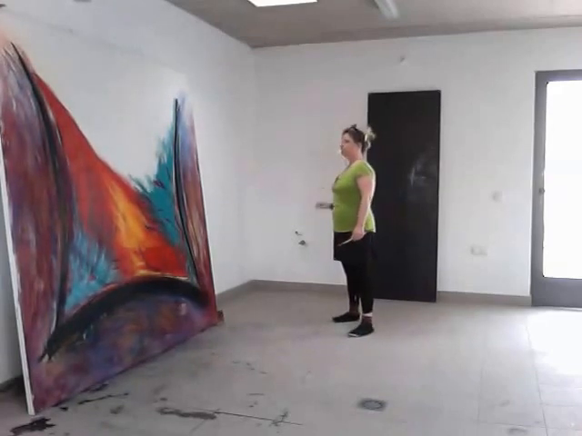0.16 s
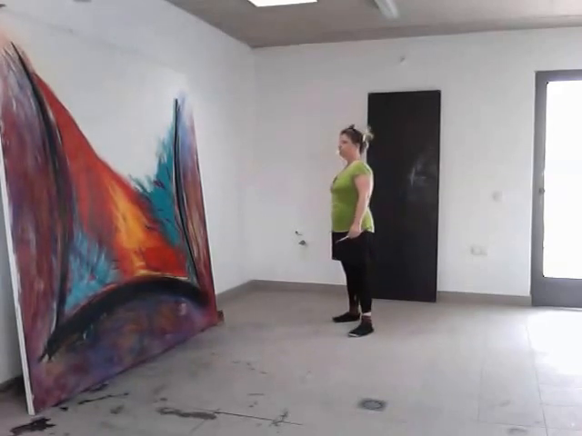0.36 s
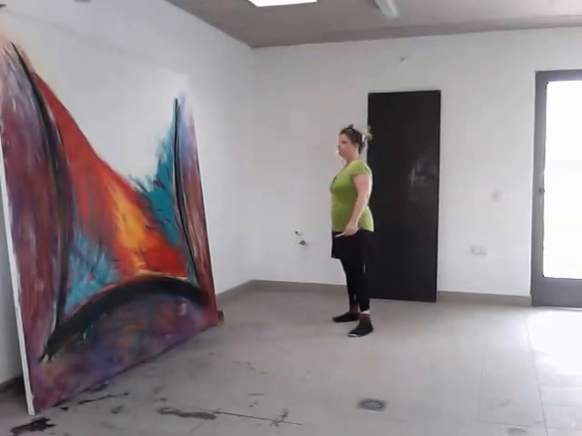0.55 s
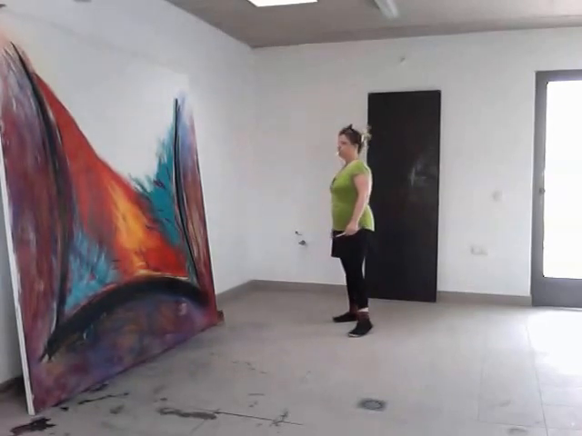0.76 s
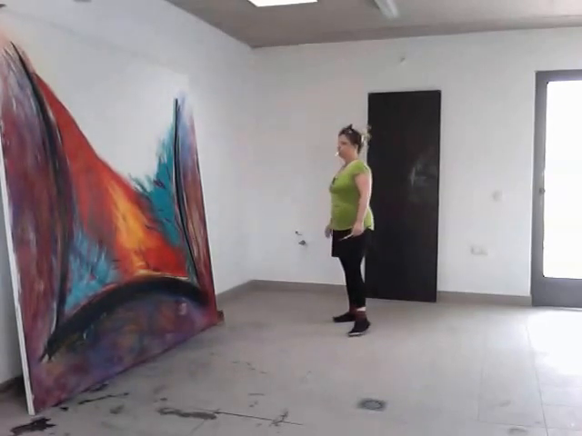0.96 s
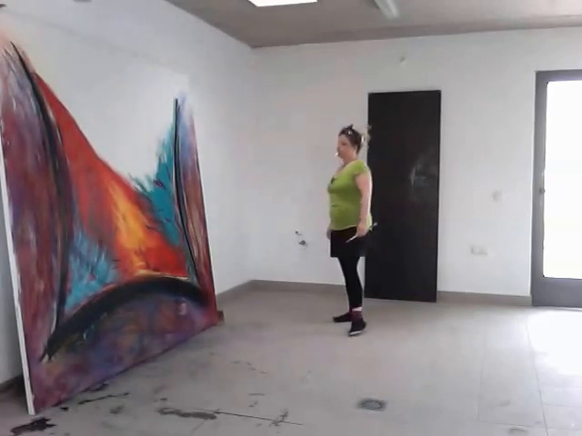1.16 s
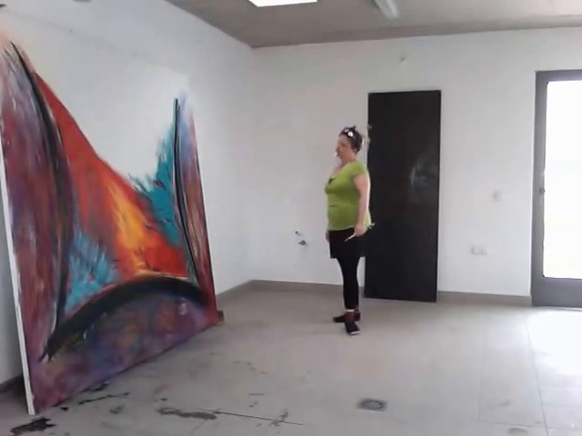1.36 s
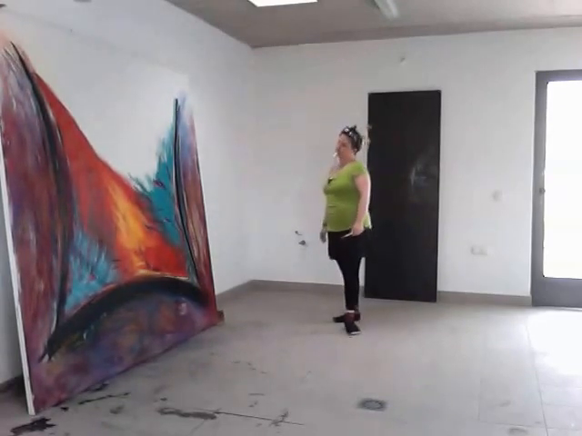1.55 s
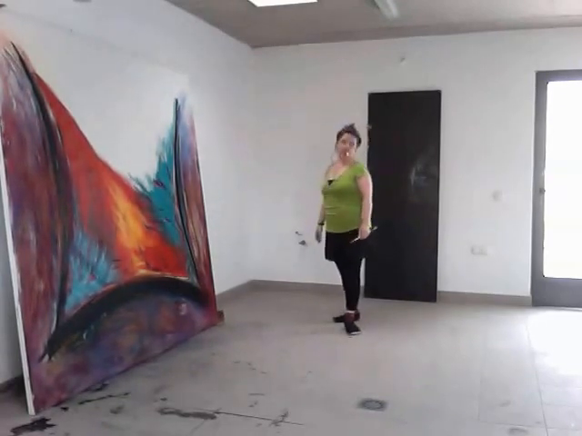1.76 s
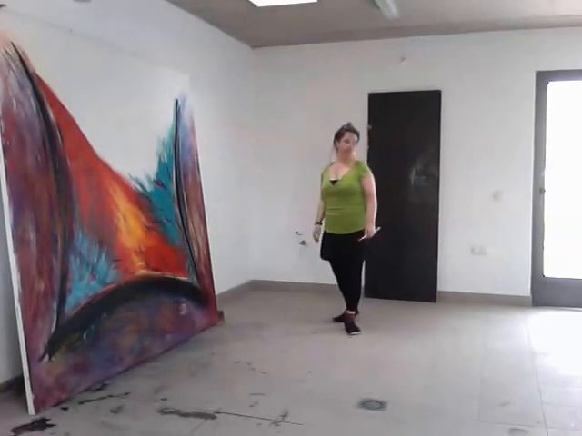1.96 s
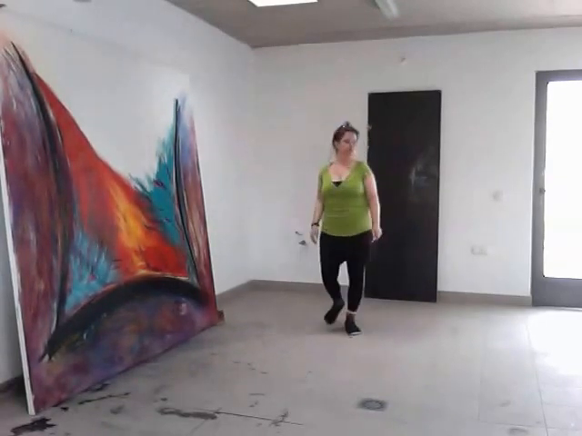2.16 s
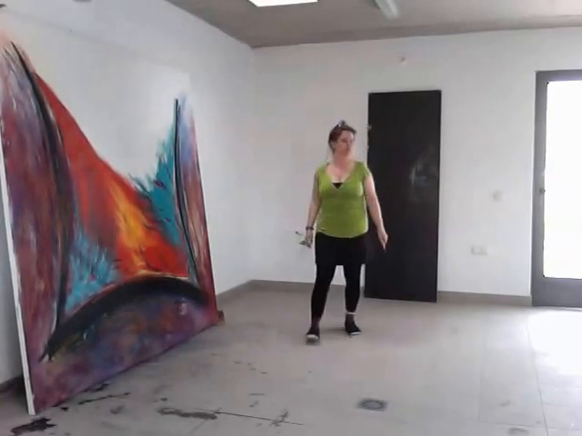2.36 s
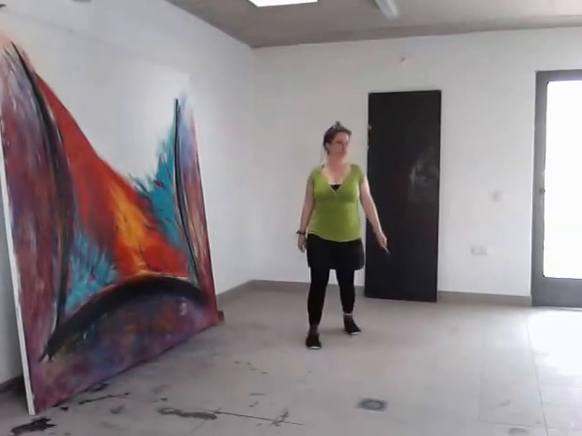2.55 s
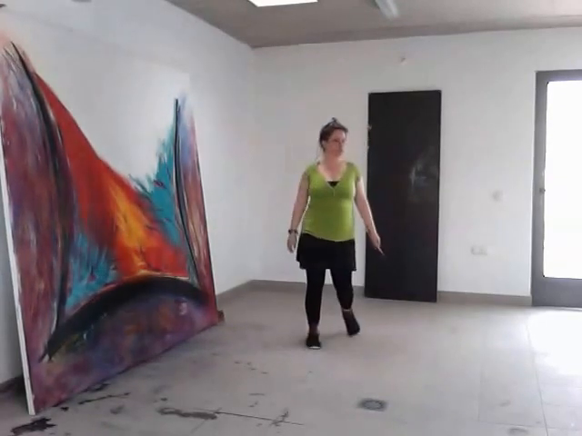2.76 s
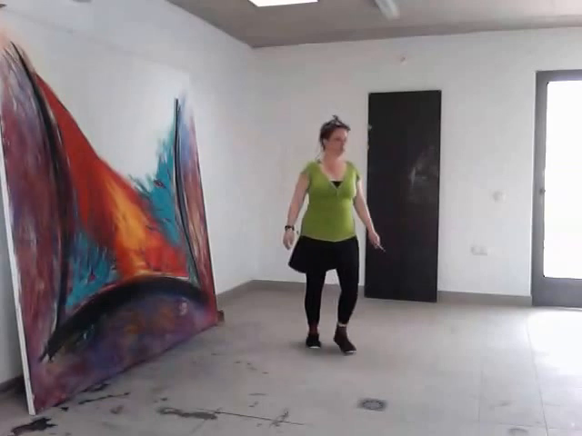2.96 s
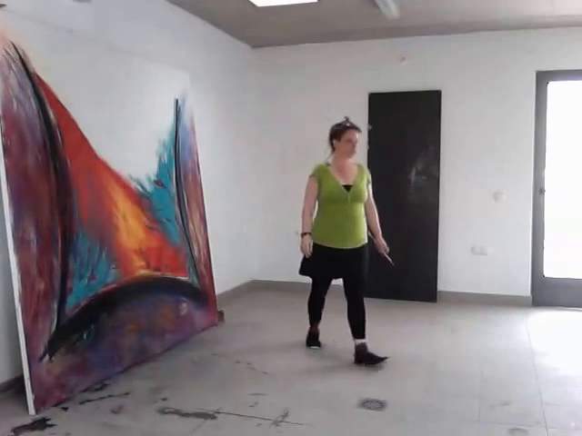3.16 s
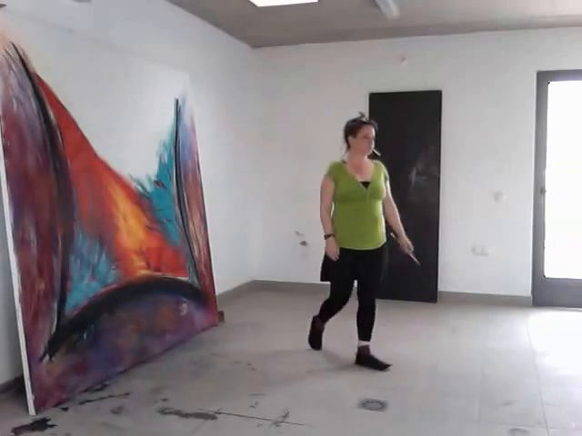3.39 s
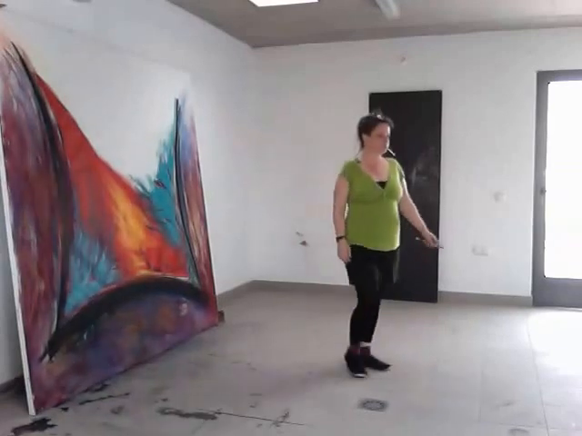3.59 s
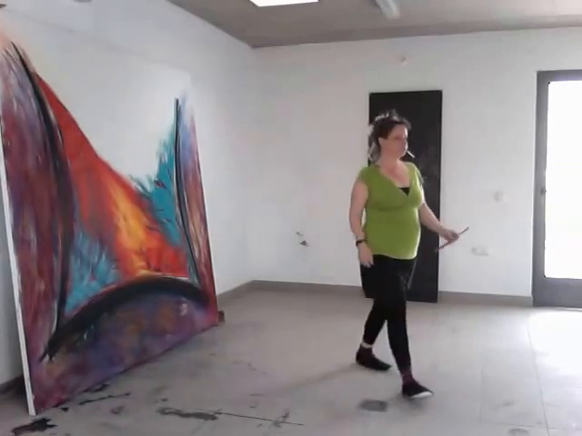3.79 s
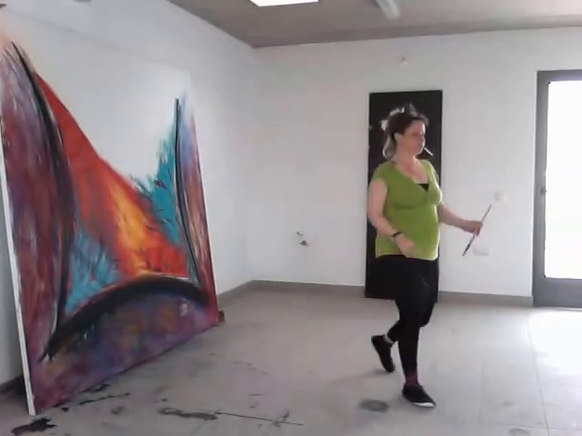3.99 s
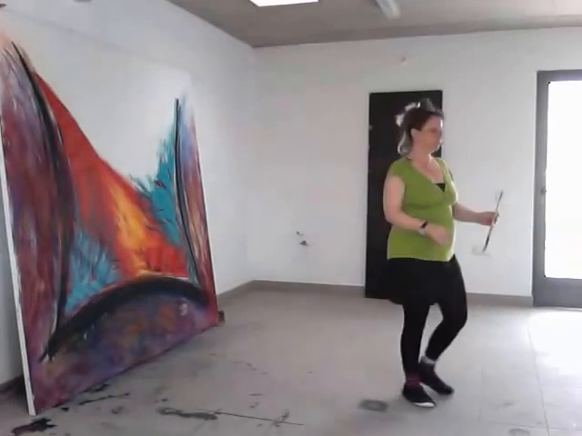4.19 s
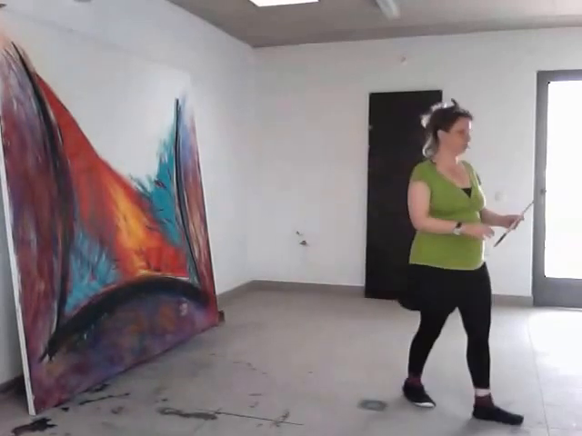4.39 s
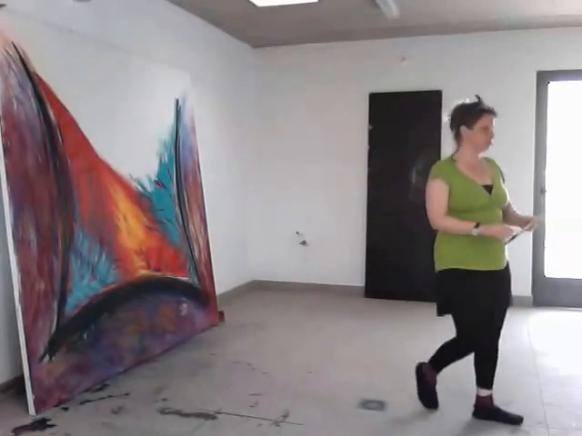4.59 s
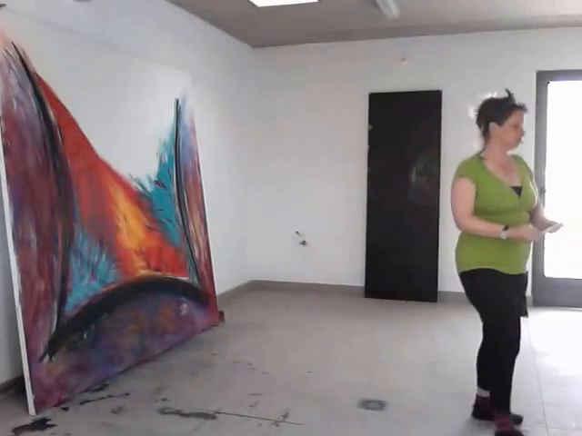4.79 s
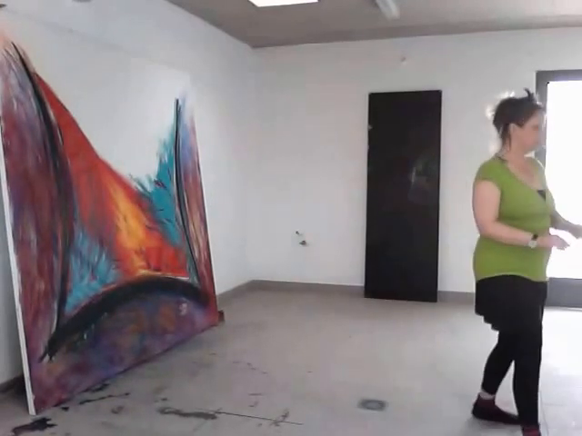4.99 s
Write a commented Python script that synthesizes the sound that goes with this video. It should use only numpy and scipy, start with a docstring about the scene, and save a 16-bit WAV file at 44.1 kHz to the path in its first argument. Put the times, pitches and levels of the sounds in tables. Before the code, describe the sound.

Soft shoes turn and then scuff across a tiled floor in a bare, echoing room, over a faint hiss and rumble.

```python
"""A bare, tiled room: someone in soft shoes turns on the spot, then walks across the floor.
One sole slides round, then five steps scuff. The sound is stick-slip friction: dense grit catches and
slips under the rubber, while light contacts of heel and toe excite resonances of the shoe.
Hard walls return early reflections and a long reverberation, over a low rumble and a faint hiss."""
import sys
import numpy as np
from scipy import signal
from scipy.fft import rfft, irfft, next_fast_len
from scipy.io import wavfile
from scipy.ndimage import uniform_filter1d

SR = 44100
rng = np.random.default_rng(int(sys.argv[2]) if len(sys.argv) > 2 else 0)


def log_audio(samples):
    """Write samples as a 16-bit WAV file to the path given in sys.argv[1]."""
    # one column per channel
    frames = np.atleast_2d(samples).T
    # limit to full scale, then quantise
    limited = np.clip(frames, -1, 1)
    pcm = np.round(limited * 32767).astype(np.int16)
    wavfile.write(sys.argv[1], SR, pcm)


N = 221955
TIME = np.arange(N) / SR
SIZE = next_fast_len(N, real=True)
FREQ = np.maximum(np.arange(SIZE // 2 + 1) * SR / SIZE, 1)
TOP_HZ = 15650


# Steps: (time [s], mid-band peak level [dB], swell [dB], time to peak [s], fade [dB/s], length [s],
#         rasp gain [dB], time to lie flat [s], treble gain [dB], heel level [dB], heel resonance [Hz])
STEPS = [(2.431, -28.5, 6.5, 0.055, 88.5, 0.23, -14.5, 0.019, -6.5, -46, 3020),
         (3.051, -32, 2.5, 0.05, 77, 0.16, -16.5, 0.01, -6.5, -31.5, 2780),
         (3.705, -32, 10, 0.0067, 63, 0.19, -18.5, 0.042, -6.5, -33, 2820),
         (4.297, -29, 2.5, 0.082, 66, 0.2, -12.5, 0.0021, -8.5, -31, 5550),
         (4.862, -30.5, 8.5, 0.037, 57, 0.14, -22, 0.034, -5.5, -32, 4160)]
# Resonance of the sole in each step: (frequency [Hz], bandwidth [Hz], boost [dB], low cutoff [Hz])
SOLE_RESONANCES = [(3670, 500, 2.5, 1470), (3080, 3000, 5.5, 1300), (4640, 800, 1.5, 1770),
                   (3950, 420, 2.5, 1250), (5010, 1200, 2, 1600)]
# Friction spectrum of a scuff: (frequency [Hz], relative level [dB])
SCUFF_SPECTRUM = [(530, -51), (900, -64), (1050, -28), (1330, -23.5), (1880, -14.5), (2070, -10.5),
                  (2570, -1.5), (3800, 0.5), (5910, -2), (6980, -5.5), (7960, -6.5), (10600, -17.5),
                  (11900, -24), (13600, -30.5), (15500, -42)]

def scuffs():
    """Sliding friction: as each skid slows, the sole flattens and rasps lower, and the grit dulls."""
    grit = slips(rate=18000, spread_db=0, judder_db=-2)
    grit = unit(grit + undb(-8.5) * squeaks(rate=820, decay_s=0.0034, spread_db=6))
    spectrum_db = along(SCUFF_SPECTRUM, FREQ) + 15.5 * above(11830, order=16)
    flatten_db_per_s, dull_db_per_s, sizzle_fade_db_per_s = 14, 50.5, 230
    out = 0
    for step, (hz, width_hz, boost_db, cutoff_hz) in zip(STEPS, SOLE_RESONANCES):
        start, peak_db, swell_db, peak_s, fade_db_per_s, length_s, rasp_db, flat_s, grit_db, *_ = step
        age = np.clip(TIME - start, 0, length_s)
        sole_db = boost_db * bell(hz, width_hz) + 10 * np.log10(above(cutoff_hz, order=12))
        held_db = 18 * np.clip(1 - age / flat_s, 0, 1)  # heel first: little rasp until the sole is down
        low_db = rasp_db + flatten_db_per_s * age - held_db
        treble_db = grit_db - dull_db_per_s * age
        sizzle_db = 1 - sizzle_fade_db_per_s * np.maximum(age - 0.135, 0)
        friction = rub(grit, spectrum_db + sole_db, low_db, treble_db, sizzle_db)
        level_db = peak_db + skid(age, swell_db, peak_s, fade_db_per_s)
        out = out + friction * undb(level_db) * contact(start, length_s, bite_s=0.008, lift_s=0.028)
    return out


def heels():
    """Impact excitation: the heel rings the shoe with a brief, dense crack as each skid begins."""
    grit = slips(rate=20000, spread_db=-0.5, judder_db=-1)
    lead_s = 0.0059
    return sum(undb(db) * pulse(start - lead_s, rise_s=0.0078, decay_s=0.01)
               * resonate(grit, hz, width_hz=610, boost_db=18.5) for start, *_, db, hz in STEPS)


SLIDE_START_S = 1.2264
# Friction spectrum of the turning sole: (frequency [Hz], relative level [dB])
SLIDE_SPECTRUM = [(290, -41), (500, -16), (579, -45), (627, -32), (898, -16.5), (1340, -2), (2970, -6.5),
                  (5330, -15), (6960, -25), (8490, -26), (10600, -36), (12000, -53), (15600, -88),
                  (22000, -120)]

def slide():
    """Stick-slip at low speed: the turning sole rubs softer and duller, and the rubber catches more."""
    grit = slips(rate=3200, spread_db=-1, judder_db=2)
    grit = unit(grit + undb(-4) * squeaks(rate=770, decay_s=0.0039, spread_db=2))
    spectrum_db = along(SLIDE_SPECTRUM, FREQ) + 3 * bell(2300, 400) - 5 * bell(730, 300)
    spectrum_db -= 6 * above(15000, order=16)
    length_s = 0.25
    age = np.clip(TIME - SLIDE_START_S, 0, length_s)
    low_db = -1.5 + skid(age, swell_db=18, peak_s=0.12, fade_db_per_s=9)
    level_db = -44 + skid(age, swell_db=21, peak_s=0.069, fade_db_per_s=26.5)
    friction = rub(grit, spectrum_db, low_db, treble_db=-24, sizzle_db=-4)
    return friction * undb(level_db) * contact(SLIDE_START_S, length_s, bite_s=0.15, lift_s=0.056)


# Toe and sole-edge contacts: (time [s], level [dB], rise [s], decay [s], resonance [Hz], boost [dB])
TOE_TAPS = [(1.264, -45, 0.037, 0.043, 2920, 32), (2.207, -43, 0.015, .008, 4500, 12),
            (2.779, -37, 0.013, .01, 3040, 9.5), (3.91, -40, 0.012, 0.012, 1980, 9),
            (4.061, -35.5, 0.01, 0.0095, 5430, 15), (4.074, -43, 0.0067, 0.023, 2700, 11),
            (4.555, -37, .007, 0.008, 3120, 39), (4.633, -47, 0.0052, 0.048, 4560, 9.5)]

def taps(grit):
    """Forced vibration: each light brush of the toe drives a broad resonance of the sole."""
    return sum(undb(db) * pulse(start, rise_s, decay_s)
               * resonate(grit, hz, width_hz=1260, boost_db=boost_db)
               for start, db, rise_s, decay_s, hz, boost_db in TOE_TAPS)


# Twists of the sole: (time [s], level [dB], decay [s], resonance [Hz])
RUBBER_CHIRPS = [(2.211, -56.5, 0.03, 2800), (2.222, -48.5, 0.024, 3900), (2.680, -52, 0.046, 5450),
                 (2.781, -75, 0.049, 8300), (2.797, -44.5, 0.043, 4400), (3.195, -48, 0.04, 2820),
                 (4.08, -52, 0.0085, 3600), (4.088, -44.5, 0.032, 5080)]

def chirps(grit):
    """Friction-driven resonance: rubber twisting on tile sounds a thin, narrow band."""
    return sum(undb(db) * pulse(start, rise_s=0.02, decay_s=decay_s)
               * resonate(grit, hz, width_hz=620, boost_db=18.5)
               for start, db, decay_s, hz in RUBBER_CHIRPS)


# Spectrum of the shoe under load: (frequency [Hz], relative level [dB])
TREAD_SPECTRUM = [(40, -25), (100, -14), (250, -31), (800, 1), (1600, 9.5), (3000, 8.5), (8000, -61)]

def treads():
    """Contact noise under load: a soft, dull rustle follows each step as the foot takes the weight."""
    lag_s, under_step_db = 0.068, 28
    load = sum(undb(db - under_step_db) * pulse(start + lag_s, rise_s=0.039, decay_s=0.3)
               for start, db, *_ in STEPS)
    return noise(TREAD_SPECTRUM) * load


# Spectrum of a brief contact: (frequency [Hz], relative level [dB])
CONTACT_SPECTRUM = [(500, -5), (1100, -6), (2000, 2), (3000, -0.5), (5000, 0.5), (6500, -3.5), (8500, -8.5),
                    (11000, -24.5), (15000, -39)]

def resonate(grit, hz, width_hz, boost_db):
    """Source and filter: grit excites one resonance of the shoe."""
    spectrum_db = along(CONTACT_SPECTRUM, FREQ) + boost_db * bell(hz, width_hz)
    return unit(shape(grit, undb(spectrum_db) * above(1150, order=6)))


def rub(grit, spectrum_db, low_db, treble_db, sizzle_db):
    """Friction noise in bands, set against the middle: a flat sole rasps, a fast one is brighter."""
    low_hz, mid_hz, treble_hz, sizzle_hz = 1000, 1950, 7000, 11000
    gain = undb(spectrum_db)
    mid, treble, sizzle = above(mid_hz, order=12), above(treble_hz, order=7), above(sizzle_hz, order=24)
    bands = [(1 - mid, low_hz, mid_hz, low_db),
             (mid - treble, mid_hz, treble_hz, 0),
             (treble * (1 - sizzle), treble_hz, sizzle_hz, treble_db),
             (treble * sizzle, treble_hz, sizzle_hz, treble_db + sizzle_db)]
    out = 0
    for share, from_hz, to_hz, band_db in bands:
        reference_rms = np.sqrt(np.mean(gain ** 2 * (FREQ > from_hz) * (FREQ < to_hz)))
        out = out + shape(grit, share * gain) / reference_rms * undb(band_db)
    return out


def slips(rate, spread_db, judder_db):
    """Stick-slip as shot noise: grit lets go in random clicks, `rate` a second, of juddering strength."""
    size = undb(spread_db * np.minimum(rng.exponential(size=N), 3.5))
    polarity = rng.choice([-1, 1], N)
    released = rng.random(N) < rate / SR
    judder = undb(judder_db * np.tanh(wander(260)))
    return unit(size * polarity * released * judder)


def squeaks(rate, decay_s, spread_db):
    """Damped oscillation: patches of rubber snap free, `rate` a second, each at its own pitch."""
    start, pitch, chance, lot = rng.random((6000, 4)).T[:, :, None]
    live = lot[:, 0] < rate * N / SR / len(lot)
    age = TIME[:SR // 40]
    size = undb(-spread_db * np.log(np.maximum(chance[live], 0.04)))
    rings = size * np.sin(2 * np.pi * TOP_HZ * pitch[live] * age) * age * np.exp(-age / decay_s)
    samples = (start[live] * N).astype(int) + np.arange(len(age))
    return unit(np.bincount(samples.ravel(), rings.ravel(), N)[:N])


def skid(age, swell_db, peak_s, fade_db_per_s):
    """Friction level in dB re its peak: it grows with load and falls as the sole slows."""
    return -swell_db * np.clip(1 - age / peak_s, 0, 1) - fade_db_per_s * np.maximum(age - peak_s, 0)


def contact(start, length_s, bite_s, lift_s):
    """Contact envelope: the sole grips linearly up to `start`, holds, then releases exponentially."""
    grip = np.clip((TIME - start) / bite_s + 1, 0, 1)
    return grip * np.exp(-np.maximum(TIME - start - length_s, 0) / lift_s)


def pulse(start, rise_s, decay_s):
    """Force pulse: a linear rise and an exponential decay."""
    age = TIME - start
    return np.clip(age / rise_s, 0, 1) * np.exp(-np.maximum(age - rise_s, 0) / decay_s)


# Decay of the room's diffuse field: (frequency [Hz], reverberation time [s])
REVERB_TIMES = [(200, 4.6), (1500, 0.97), (3000, 1.05), (6000, 0.69), (12000, 0.21)]

def room(x, early_db, early_t60, late_db):
    """Reverberation: direct sound, early wall reflections and a diffuse tail dulled by absorption."""
    age = TIME[:2 * SR]
    echoes = rng.standard_normal(len(age)) * (rng.random(len(age)) < 2500 / SR)  # 2500 a second
    echoes *= undb(-60 * age / early_t60) * (age > 0.002)
    echoes = shape(unit(echoes), 1 - above(14400, order=6))  # walls and air absorb the highest sizzle
    diffuse, tail = rng.standard_normal(len(age)), 0
    centres, t60s = np.transpose(REVERB_TIMES)
    for t60, weights in zip(t60s, np.eye(len(centres))):
        band = np.interp(np.log(FREQ), np.log(centres), weights)
        tail = tail + shape(diffuse, band) * undb(-60 * age / t60)
    build_up = np.minimum(age / 0.072, 1)
    tail = shape(tail, 1 - above(11500, order=12)) * build_up
    response = (undb(early_db) * echoes + undb(late_db) * unit(tail)) / np.sqrt(len(age))
    response[0] += 1  # direct path
    energy = 1 + undb(early_db) ** 2 + undb(late_db) ** 2
    return signal.fftconvolve(x, response)[:N] / np.sqrt(energy)


# Spectrum of the room's rumble: (frequency [Hz], relative level [dB])
RUMBLE_SPECTRUM = [(25, -29), (55, -19.5), (85, -0.5), (120, -2), (220, 0.5), (380, -5.5), (750, -3.5),
                   (1100, -5.5), (2500, -10.5), (6000, -17), (12000, -33)]

def rumble():
    """Incoherent addition: each move of the feet adds a swell of power to a low, wavering rumble."""
    rest_db, swell_db = -75.5, -57.5
    moves = [SLIDE_START_S] + [step[0] for step in STEPS]
    stirred = sum(pulse(start, rise_s=0.092, decay_s=0.97) ** 2 for start in moves)
    amplitude = np.sqrt(undb(rest_db) ** 2 + undb(swell_db) ** 2 * stirred)
    return amplitude * undb(0.8 * wander(3.9)) * noise(RUMBLE_SPECTRUM)


# Spectrum of the noise floor: (frequency [Hz], relative level [dB])
HISS_SPECTRUM = [(15, -76), (25, -58), (84, -5), (118, -6), (203, -2.5), (298, -5.5), (340, -10.5),
                 (397, -9.5), (797, -9), (979, -16.5), (1110, -11), (4860, -16), (12000, -35), (15600, -71),
                 (22000, -120)]

def hiss():
    """Stationary broadband noise: a faint, steady floor under the steps."""
    return undb(-65) * shape(noise(HISS_SPECTRUM), 1 - above(12000, order=12))


def noise(spectrum):
    """Gaussian noise with the given spectrum, at rms 1."""
    return unit(shape(rng.standard_normal(N), undb(along(spectrum, FREQ))))


def wander(rate):
    """Random modulation: ramps between `rate` values a second, with a spread near 1."""
    hold = int(SR / rate)
    levels = np.repeat(rng.standard_normal(N)[:N // hold + 1], hold)
    return 1.2 * uniform_filter1d(levels, hold)[:N]


def shape(x, gain):
    """Zero-phase filtering by a gain for each frequency."""
    return irfft(rfft(x, SIZE) * gain, SIZE)[:len(x)]


def bell(hz, width_hz):
    """Lorentzian resonance curve, 1 at its centre."""
    return 1 / (1 + (2 * (FREQ - hz) / width_hz) ** 2)


def above(hz, order):
    """High-pass curve, one half at `hz`."""
    return 1 / (1 + (hz / FREQ) ** order)


def along(points, hz):
    """Interpolation of a spectrum on a log-frequency axis."""
    frequencies, values = np.transpose(points)
    return np.interp(np.log(hz), np.log(frequencies), values)


def undb(db):
    """Decibels to amplitude ratio."""
    return 10 ** (np.asarray(db) / 20)


def unit(x):
    """Normalisation to rms 1."""
    return x / np.sqrt(np.mean(x ** 2))


# Boundaries between the places the feet occupy in the room: (time [s])
STRIDE_TIMES = [0, 2.1, 2.95, 3.6, 4.2, 4.75, 5.1]

def scene():
    """Superposition: the shoes meet a new pattern of reflections at each stride, over hiss and rumble."""
    shoes = scuffs() + slide()
    grit = slips(rate=5500, spread_db=1, judder_db=-1)
    grit = unit(grit + undb(-4.5) * squeaks(rate=700, decay_s=0.0024, spread_db=7))
    shoes += taps(grit) + chirps(grit) + treads() + heels()
    heard = sum(room(shoes * (TIME >= start) * (TIME < end), early_db=-6, early_t60=0.34, late_db=-15)
                for start, end in zip(STRIDE_TIMES, STRIDE_TIMES[1:]))
    return (heard + hiss() + rumble())[None]


def record(dry):
    """Frequency response of a small microphone: two dips in the treble and a steep low-pass."""
    dips = undb(-5 * bell(6900, 240) - 64 * bell(12180, 824))
    low_pass = signal.ellip(10, 0.2, 70, TOP_HZ, fs=SR, output="sos")
    return signal.sosfilt(low_pass, shape(dry[0], dips))[None]


dry = scene()
out = record(dry)
log_audio(out)
```